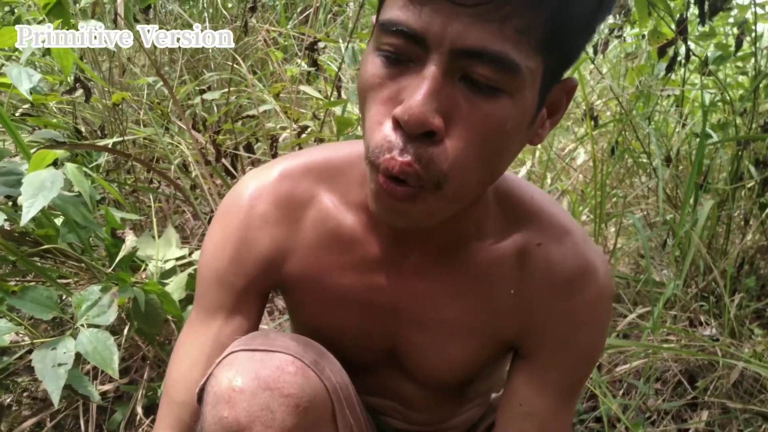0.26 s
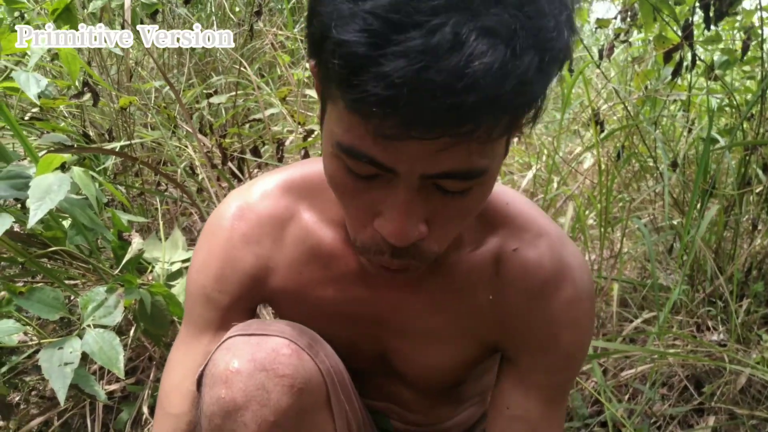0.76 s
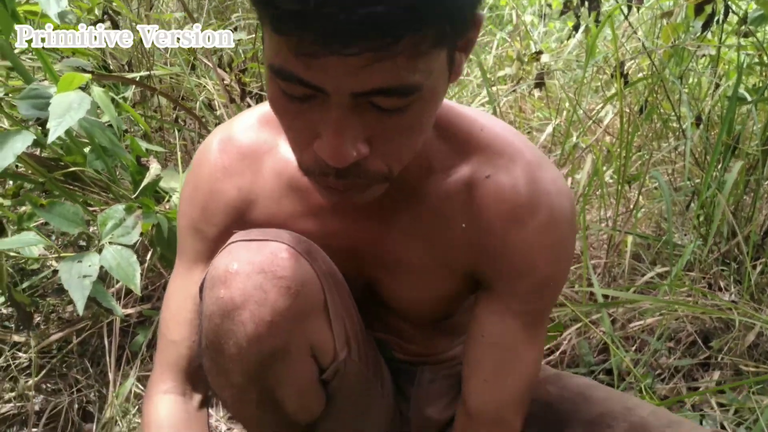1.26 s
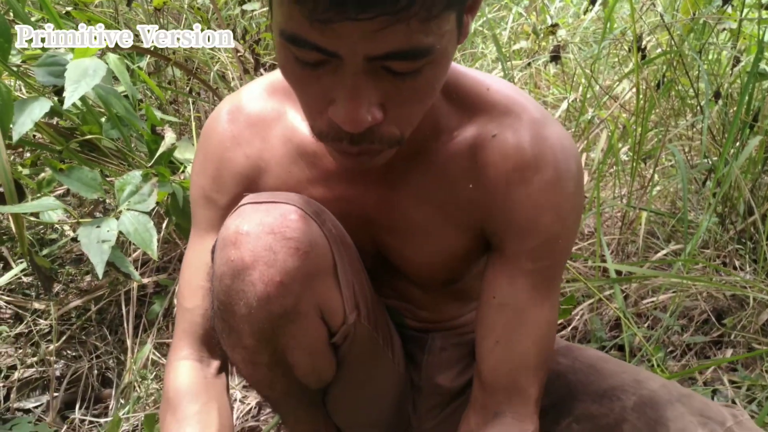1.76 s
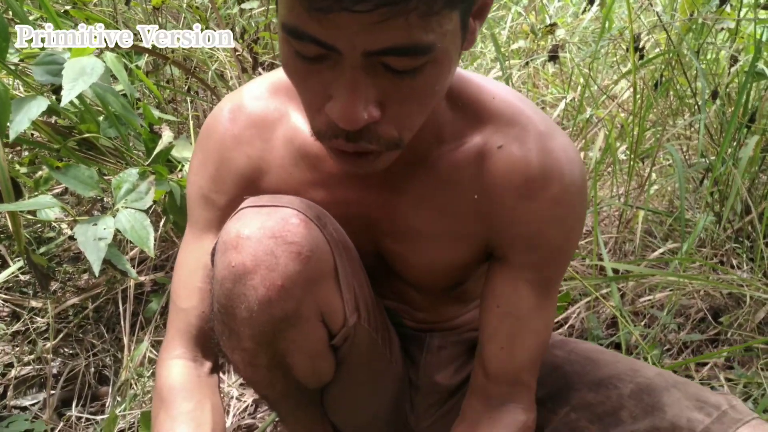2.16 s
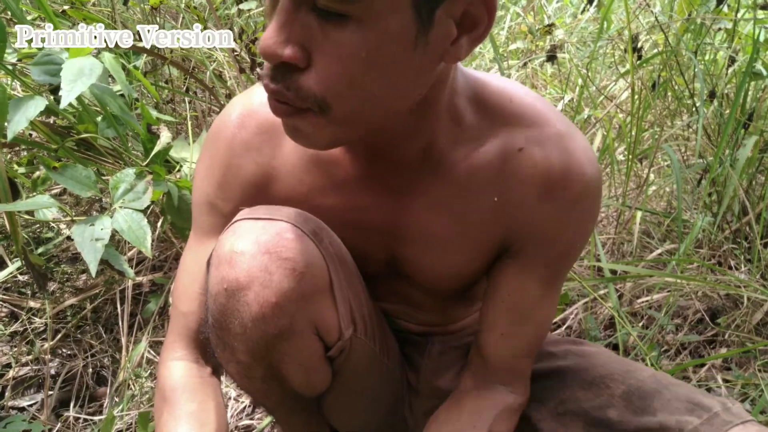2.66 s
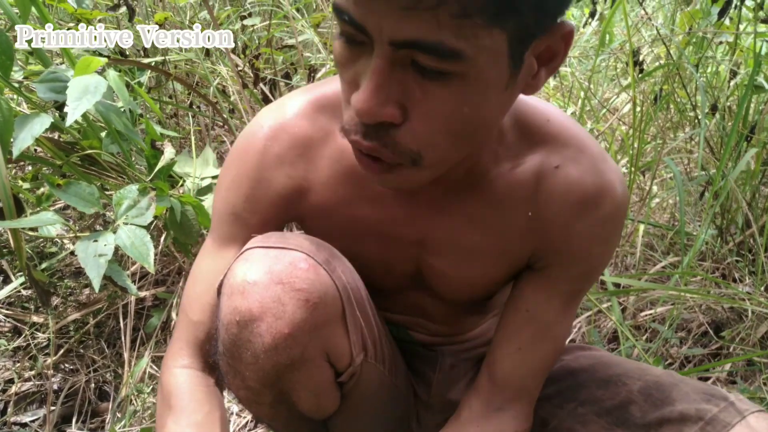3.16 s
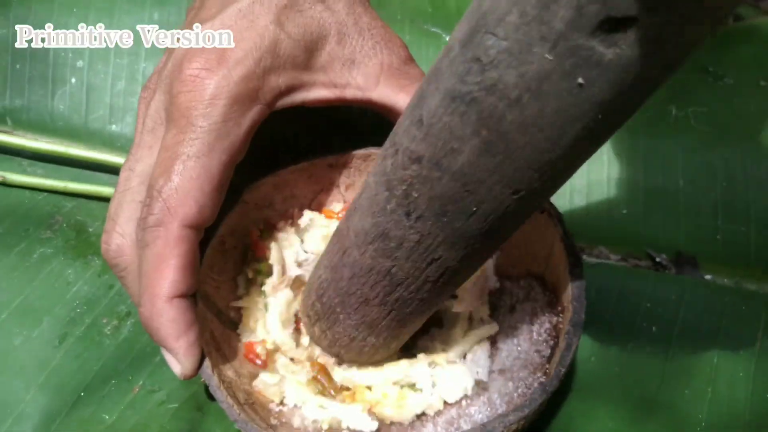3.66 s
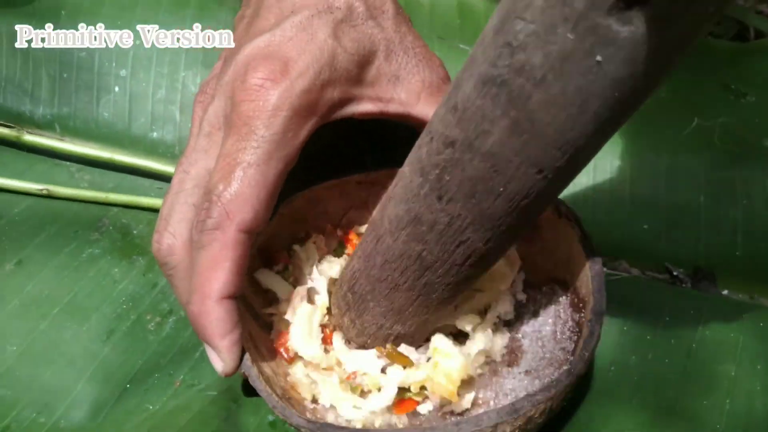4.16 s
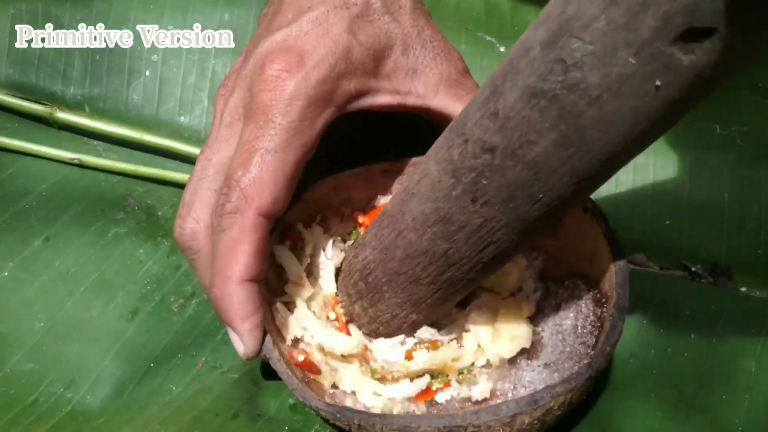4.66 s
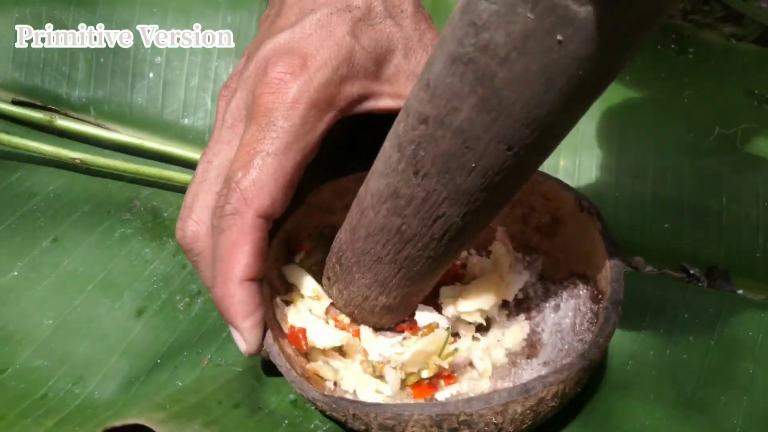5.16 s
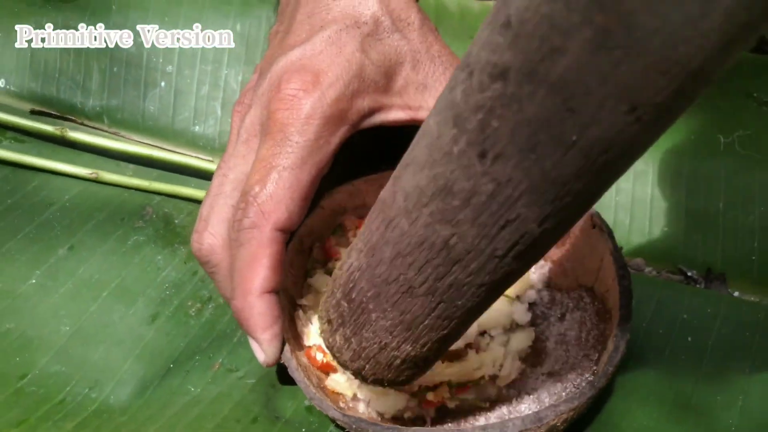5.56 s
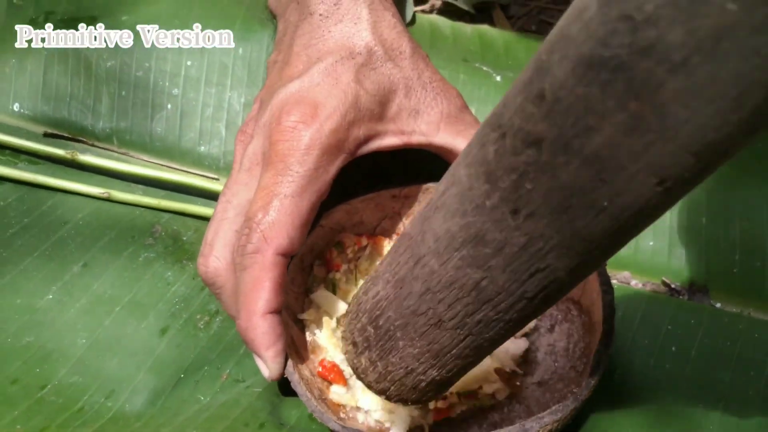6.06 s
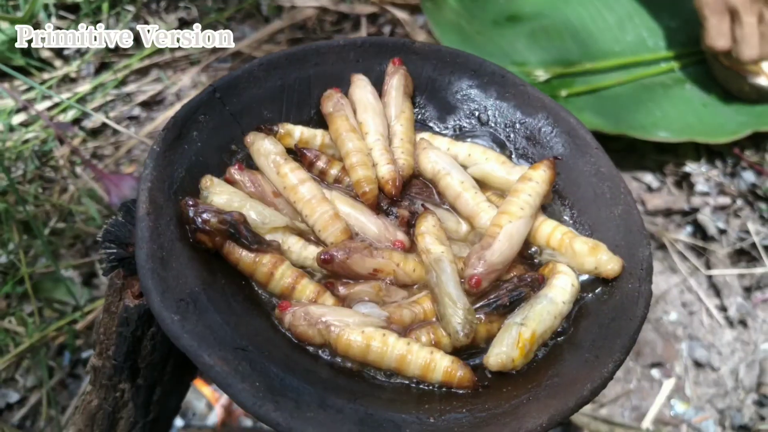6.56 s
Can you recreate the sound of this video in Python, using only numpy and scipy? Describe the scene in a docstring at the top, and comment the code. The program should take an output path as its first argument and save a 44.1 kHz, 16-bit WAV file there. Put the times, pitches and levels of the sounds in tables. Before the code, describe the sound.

Steady, moist pestle strokes thud and knock in a little bowl, first faint, then close, above a softly throbbing outdoor rumble.

```python
"""First comes a low outdoor rumble, with a soft throb ten times a second. Then a wooden pestle pounds
ginger, garlic and chilli in a small hand-held mortar on the ground, a few steps away, later close up.
Each stroke crushes wet pulp and thuds the bowl on the soil; where it gets through, wood knocks on
the bowl. Faint ticks, hollow bumps and wet smacks come in between. The sound drops to silence twice;
after the second gap a pan sizzles faintly."""
import sys
import numpy as np
from scipy import signal
from scipy.fft import rfft, irfft
from scipy.io import wavfile
from scipy.ndimage import uniform_filter1d

SR = 44100
rng = np.random.default_rng(int(sys.argv[2]) if len(sys.argv) > 2 else 0)


def inscribe(sig):
    """Save sig as 16-bit PCM at rate SR to the path in sys.argv[1].

    A 1-D sig is mono; a 2-D sig holds one channel per row.
    Samples are clipped to [-1, 1] before scaling.
    """
    pcm = np.round(np.clip(np.atleast_2d(sig).T, -1, 1) * 32767)
    wavfile.write(sys.argv[1], SR, pcm.astype(np.int16))


N = 300762
TIME = np.arange(N) / SR
FREQ = np.fft.rfftfreq(N, 1 / SR)

# Tone of the outdoor air. Each row: frequency in Hz, gain in dB.
AIR_TONE = [(20, -51.5), (30, -15), (40, -4), (52, 3.5), (90, 2), (130, -8.5), (200, -8), (300, -23),
            (500, -24), (1000, -28.5), (2200, -31.5), (4200, -34), (7900, -45.5), (10000, -41),
            (16000, -41.5)]
# How alike the air is in both ears. Each row: frequency in Hz, shared part from 0 to 1.
AIR_LIKENESS = [(50, 0.56), (130, 0), (290, 0.58), (700, 0), (2000, 0)]
# Which way the air leans. Each row: frequency in Hz, left minus right in dB.
AIR_PAN = [(45, 13.5), (110, -5), (250, -4.5), (1200, -4), (4400, -0.5), (15000, -1)]
# Runs of the throb. Each row: first beat, end and time between beats, all in seconds.
THROBS = [(.0365, 3.39, .1005), (3.5175, 6.29, .10058), (6.4555, 6.81, .1005)]
# Pestle strokes. Each row: landing and sinking time in seconds, then pulp, juice and thud levels in dB.
STROKES = [ (.2245, 0.002, -44, -51.5, -29), (.452, 0.0034, -45.5, -53, -32),
           (0.686, 0.0033, -49, -52.5, -32.5), (0.918, 0.0016, -45, -53.5, -32),
           (1.134, 0.0026, -50, -51.5, -48), (1.36, .008, -49.5, -50, -41), (1.577, 0.0077, -45, -48, -38),
           (1.813, 0.0045, -52, -49.5, -54), (2.011, 0.0027, -49, -48.5, -36),
           (2.248, 0.012, -44, -44, -44), (2.485, 0.01, -50, -48, -49), (2.709, 0.018, -57, -52, -44),
           (2.944, 0.012, -55, -50.5, -67), (3.173, 0.012, -51.5, -49.5, -41),
           (3.607, 0.0089, -45.5, -45, -26), (3.86, 0.014, -39.5, -42, -28.5),
           (4.134, .011, -37.5, -40, -26), (4.3891, 0.0017, -33.5, -36.5, -25),
           (4.654, 0.0091, -39, -37.5, -28), (4.915, 0.0063, -39, -47, -28.5),
           (5.1769, .0005, -31.5, -44, -19.5), (5.418, 0.011, -41.5, -44, -28),
           (5.658, 0.0088, -38, -42.5, -30), (5.899, 0.007, -35.5, -40.5, -24.5),
           (6.144, 0.0058, -37, -41, -24)]
# Listening spots, far then close. Each row: start in seconds, squelch pitch in Hz,
# then left minus right in dB for the pulp and for the juice.
SPOTS = [(0, 3870, -7, -1.5), (3.44, 3560, -2.5, 4.5)]
# Tones of crushed pulp and spitting juice. Each row: frequency in Hz, gain in dB.
PULP_TONE = [(120, 7), (250, 13), (450, 10.5), (640, 12.5), (900, 13.5), (1250, 6.5), (1700, 9.5),
             (2200, 1.5), (3200, -0.5), (6000, -24), (16000, -23)]
JUICE_TONE = [(300, -18), (1200, 2.5), (2300, 4), (3000, 11), (3700, 4.5), (4500, 8.5), (5500, 2),
              (6700, -0.5), (7900, -25.5), (9500, -4.5), (12500, -11.5), (16000, -15.5)]
# The pestle hits the bowl. Each row: start in seconds, level in dB, contact time in milliseconds.
KNOCKS = [(.2245, -25.5, 1.9), (.4545, -31, 1.97), (0.6873, -41.5, 2.5), (0.923, -35.5, 2.3),
          (1.579, -38, 1.54), (1.6671, -36, 0.52), (2.013, -37.5, 3.8), (2.943, -49, 3.4), (3.169, -39, 4),
          (3.6077, -23, 2.6), (3.857, -17.5, 1.31), (4.136, -15, 1.7), (4.3881, -10, 1.32),
          (4.651, -27.5, 2.8), (4.673, -36.5, 3.1), (4.922, -31, 0.58), (5.1764, -18, 1.72),
          (5.662, -39, 5.6), (5.906, -32, 5.5), (6.1501, -25.5, 1.46)]
# How bowl and pestle ring, damped by hand and food. Each row: pitch in Hz, width in Hz, gain in dB.
BOWL_RINGS = [(182, 53, 4.5), (246.4, 59, 4), (398, 137, -1), (566, 185, -6), (664, 88, 1.5),
              (858, 240, -20), (965, 100, 1.5), (1230, 280, -0.5), (1820, 210, 6.5)]
# Bumps, as of fingers on the left microphone's case. Each row: start in seconds, level in dB.
BUMPS = [(2.975, -36.5), (3.299, -40.5), (5.627, -41.5), (6.1995, -33.5), (6.26, -40)]
# How that hollow case rings. Each row: pitch in Hz, width in Hz, gain in dB.
CASE_RINGS = [(171, 74, 8), (318.5, 32, 6), (472, 40, -21), (810, 860, 3.5)]
# The pestle pulls free of the wet food. Each row: time in seconds, level in dB.
PULLS = [(3.133, -57), (3.667, -60), (3.933, -49.5), (4.72, -53.5), (5.711, -60)]
# Silent gaps. Each row: start, end and fade-in time, all in seconds.
SILENCES = [(3.393, 3.441, .17), (6.289, 6.353, .17)]
# Loudness of the pan. Each row: time in seconds, level in dB.
SIZZLE_LEVELS = [(6.35, -56), (6.55, -58), (6.82, -54)]
# Tone of the hot oil. Each row: frequency in Hz, gain in dB.
SIZZLE_TONE = [(500, 1.5), (1300, -4), (2000, -7), (3200, 5), (4500, -1), (6000, -3.5), (7900, -17),
               (10000, -8.5), (16000, -14)]

PACKING_S = (4.85, 5.3)  # between these times, loose pieces pack into a firm paste
# Each pair: the value for loose food, then for packed food.
RELEASE_S, TILT_DB_PER_OCTAVE, THUD_HZ = (0.013, 0.0063), (-2.25, 0.5), (79.4, 95.7)


def undb(db):
    """Turn decibels into a number to multiply by."""
    return 10 ** (np.asarray(db) / 20)


def placed(x, pan_db):
    """Make a sound stereo, with the left side pan_db above the right."""
    return x * undb(np.array([[pan_db], [-pan_db]]) / 2)


def add(out, s, x):
    """Mix a stereo sound in, starting at s seconds."""
    i = int(round(s * SR))
    lo, hi = max(i, 0), min(i + x.shape[1], N)
    out[:, lo:hi] += x[:, lo - i:hi - i]


def along(points):
    """Join (Hz, value) points into a curve over all frequencies."""
    hz, value = np.transpose(points)
    return np.interp(np.log(FREQ + 1), np.log(hz), value)


def colour(x, tone):
    """Shape a sound with a tone table."""
    return irfft(rfft(x) * undb(along(tone)), N)


def ringing(rings, size):
    """A filter for something that rings at a few pitches; wider rings die sooner."""
    jf = 1j * np.fft.rfftfreq(size, 1 / SR)
    return sum(undb(db) * jf * width / (jf ** 2 + jf * width + hz ** 2) for hz, width, db in rings)


def outdoors(db=-29):
    """A low rumble, partly alike in both ears, under a thin, even hiss."""
    common, *own = rfft(rng.standard_normal((3, N)))
    share = np.clip(along(AIR_LIKENESS), 0, 1)
    noise = np.sqrt(share) * common + np.sqrt(1 - share) * np.array(own)
    lean = undb(np.outer([1, -1], along(AIR_PAN)) / 2)
    return colour(irfft(lean * noise, N), AIR_TONE) * undb(db)


def throbbing(hz=106, glide_hz_per_s=-1100, width_s=0.0083, db=-38.5, pan_db=-4):
    """A soft, low pulse that falls in pitch and repeats evenly."""
    out = np.zeros((2, N))
    t = np.arange(-SR // 30, SR // 30) / SR
    cycles = hz * t + glide_hz_per_s * t ** 2 / 2
    beat = -np.exp(-(t / width_s) ** 2) * np.sin(2 * np.pi * cycles)
    for first, end, period in THROBS:
        for s in np.arange(first, end, period):
            gain = undb(db + 0.12 * rng.standard_normal())
            add(out, s + t[0] + 0.00052, placed(beat * gain, pan_db))
    return out


def grains(spread_db, shared):
    """Noise made of tiny bursts of uneven size, partly the same in both ears."""
    gain = undb(spread_db * np.minimum(rng.exponential(size=N // 8 + 1), 5)).repeat(8)[:N]
    noise = rng.standard_normal((3, N)) * gain / np.sqrt(np.mean(gain ** 2))
    return np.sqrt(shared) * noise[2] + np.sqrt(1 - shared) * noise[:2]


def packed(s, loose, firm):
    """A value at time s, sliding from loose to firm as the food packs."""
    return np.interp(s, PACKING_S, (loose, firm))


def squeeze(t, rise_s, fall_s):
    """Pressure on the food builds until t = 0, then lets go."""
    return np.exp(-np.where(t < 0, abs(t / rise_s) ** 1.14, abs(t / fall_s) ** 1.05))


def lumps(size, lump_db=2.5, hold=128):
    """Pieces of food give way one by one, so the level jumps every few milliseconds."""
    steps = rng.uniform(-1.94, 1.8, size // hold).repeat(hold)
    return undb(lump_db * uniform_filter1d(steps, hold))


def crushing(squelch_width_hz=450, squelch_db=-2, pitch_scatter=0.023, hiss_db=-3, tail_db=-28):
    """Fibres burst as the pestle sinks; juice spits through a gap whose pitch changes each stroke."""
    pulp, juice = np.zeros((2, N)), np.zeros((2, N))
    size = 16384
    t = (np.arange(size) - size // 2) / SR
    octaves = np.log2(np.clip(np.fft.rfftfreq(size, 1 / SR), 400, 2200) / 1300)
    fibres, spray = grains(spread_db=0.5, shared=0.66), grains(spread_db=2.5, shared=0.46)
    tail = undb(tail_db) * (t > 0) * np.exp(-abs(t) / 0.06)  # sound scattered by the undergrowth
    for (s, sink, pulp_db, juice_db, _), opening in zip(STROKES, rng.standard_normal(len(STROKES))):
        _, hz, pulp_pan_db, juice_pan_db = SPOTS[int(s > SPOTS[1][0])]
        release = packed(s, *RELEASE_S) - 0.13 * sink  # a slower stroke lets go faster
        swell = squeeze(t, sink, release) * lumps(size) + tail
        start = s + sink + t[0]
        now = (int(start * SR) + np.arange(size)) % N
        tilt = undb(packed(s, *TILT_DB_PER_OCTAVE) * octaves)  # packed food sounds brighter
        crunch = irfft(rfft(fibres[:, now] * swell) * tilt)
        squelch_hz = hz * np.exp(pitch_scatter * opening)
        gap = undb(hiss_db) + ringing([(squelch_hz, squelch_width_hz, squelch_db)], size)
        squelch = irfft(rfft(spray[:, now] * swell) * gap)
        add(pulp, start, placed(crunch * undb(pulp_db), pulp_pan_db))
        add(juice, start, placed(squelch * undb(juice_db), juice_pan_db))
    return colour(pulp, PULP_TONE) + colour(juice, JUICE_TONE)


def strike(rings, contact_ms, chatter, size=4096):
    """One hit: longer contact sounds duller, and rough surfaces chatter after landing."""
    t = np.arange(size) / SR
    rattle = chatter * rng.standard_normal(size) * (1 - np.exp(-t / 0.0063)) * np.exp(-t / 0.016)
    cushion = signal.butter(4, 1000 / contact_ms, fs=SR, output="sos")
    force = signal.sosfilt(cushion, signal.unit_impulse(size) + rattle)
    sound = irfft(rfft(force) * ringing(rings, size))
    return -sound / abs(sound).max()


def knocking(pan_db=-10):
    """The pestle reaches the bowl, cushioned by more or less food."""
    out = np.zeros((2, N))
    for s, db, contact_ms in KNOCKS:
        add(out, s, placed(strike(BOWL_RINGS, contact_ms, chatter=0.011) * undb(db), pan_db))
    return out


def cracking(hz=4350, width_hz=650, db=-13, db_per_ms=-5, decay_s=0.00046, pan_db=2, size=1024):
    """The hard pestle starts each knock with a short, high crack, weaker when cushioned."""
    out = np.zeros((2, N))
    for s, knock_db, contact_ms in KNOCKS:
        burst = rng.standard_normal(size) * np.exp(-np.arange(size) / SR / decay_s)
        crack = irfft(rfft(burst) * ringing([(hz, width_hz, 0)], size))
        gain = undb(knock_db + db + db_per_ms * contact_ms)
        add(out, s + 0.001, placed(crack / abs(crack).max() * gain, pan_db))
    return out


def swing(hz, swell_s=0.011):
    """A low thud that swells and dies within a few swings."""
    t = np.arange(SR // 8) / SR
    age = t / swell_s
    return (age * np.exp(1 - age)) ** 2.76 * np.cos(2 * np.pi * hz * t)


def thudding(lag_s=0.0027, pan_db=-6):
    """Each stroke bounces the bowl on the springy soil, at a higher pitch once the food is packed."""
    out = np.zeros((2, N))
    for s, *_, db in STROKES:
        add(out, s + lag_s, placed(swing(packed(s, *THUD_HZ)) * undb(db), pan_db))
    return out


def ticking(count=16, hz=2600, width_hz=2000, db=-49, scatter_db=2, decay_s=0.00047, size=1024):
    """Dry grass and crumbs tick faintly at random moments."""
    out = np.zeros((2, N))
    for s in rng.uniform(0, N / SR, count):
        burst = rng.standard_normal((2, size)) * np.exp(-np.arange(size) / SR / decay_s)
        tick_db = db + scatter_db * rng.standard_normal()
        add(out, s, irfft(rfft(burst) * ringing([(hz, width_hz, tick_db)], size)))
    return out


def bumping(pan_db=8, thump_hz=75, thump_db=-2):
    """Soft touches ring the hollow case briefly and rock it with a low thump."""
    out = np.zeros((2, N))
    for s, db in BUMPS:
        add(out, s, placed(strike(CASE_RINGS, contact_ms=2.6, chatter=0.0073) * undb(db), pan_db))
        add(out, s, placed(swing(thump_hz) * undb(db + thump_db), pan_db=0))
    return out


def smacking(hz=3700, width_hz=1600, rise_s=0.005, fall_s=0.011, pan_db=4):
    """A film of juice tears as the pestle lifts."""
    swell = sum(undb(db) * squeeze(TIME - s, rise_s, fall_s) for s, db in PULLS)
    tearing = grains(spread_db=1, shared=0.55) * swell
    smacks = irfft(rfft(tearing) * ringing([(hz, width_hz, 0)], N), N)
    return placed(colour(smacks, JUICE_TONE), pan_db)


def silences(return_gain=0.073):
    """A volume curve: zero in each gap, then the sound returns softly and fades in."""
    gain = np.ones(N)
    for start, end, fade in SILENCES:
        fade_in = np.interp(TIME, (end, end + fade), (return_gain, 1))
        gain *= np.where(TIME < end, TIME < start, fade_in)
    return uniform_filter1d(gain, size=200)


def frying():
    """Hot oil fizzes in fine bubbles."""
    s, db = np.transpose(SIZZLE_LEVELS)
    fizz = colour(grains(spread_db=4, shared=0.11), SIZZLE_TONE)
    return fizz * undb(np.interp(TIME, s, db)) * (TIME > s[0])


def scene():
    """Mix it all. The mortar is to the right, so the left ear hears it a little later."""
    near = crushing() + knocking() + cracking() + thudding() + throbbing() + smacking()
    near[0] = np.roll(near[0], 11)  # 11 samples, a quarter of a millisecond
    return near + bumping() + outdoors() + frying() + ticking()


def record(dry, low_hz=36.7, top_hz=15800):
    """The microphone drops the deepest bass; then come the silent gaps and a steep cut of the top."""
    bass_cut = signal.butter(4, low_hz, "high", fs=SR, output="sos")
    top_cut = signal.ellip(8, 0.2, 70, top_hz, fs=SR, output="sos")
    return signal.sosfilt(top_cut, signal.sosfilt(bass_cut, dry) * silences())


dry = scene()
out = record(dry)
inscribe(out)
```